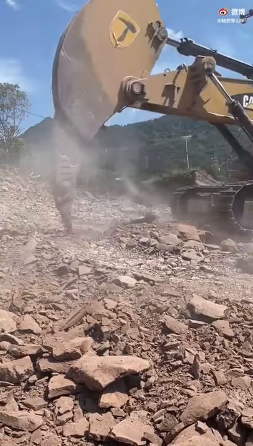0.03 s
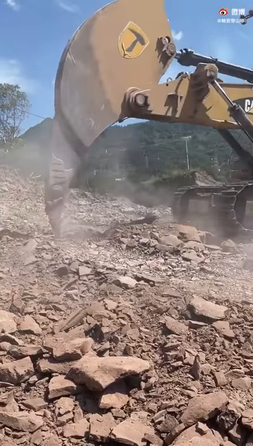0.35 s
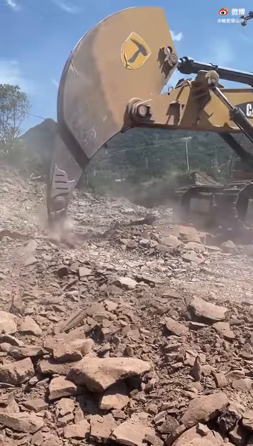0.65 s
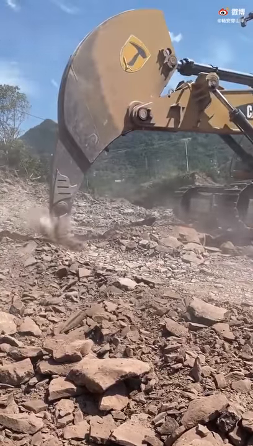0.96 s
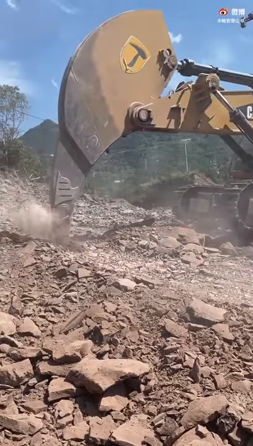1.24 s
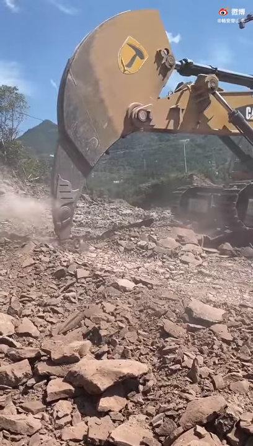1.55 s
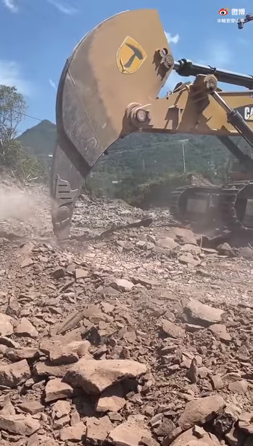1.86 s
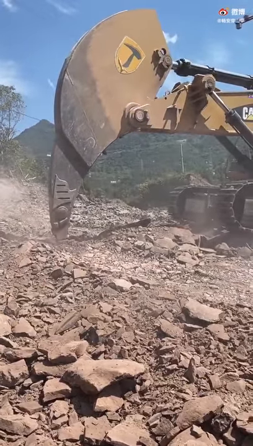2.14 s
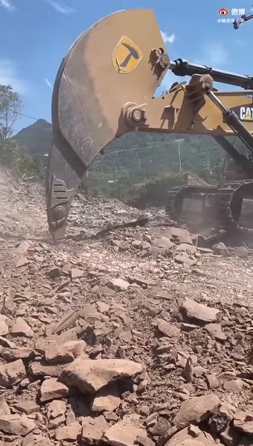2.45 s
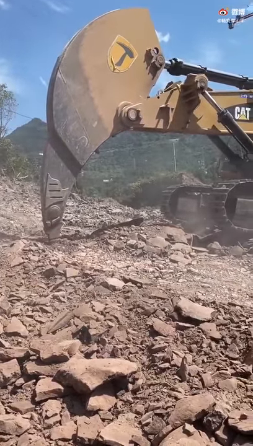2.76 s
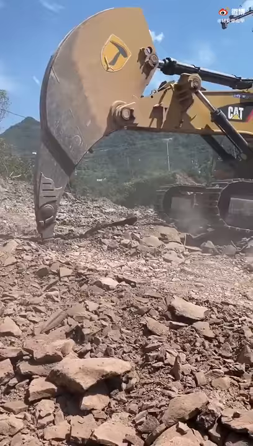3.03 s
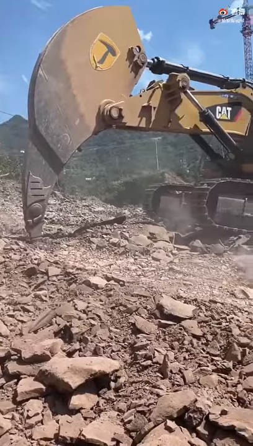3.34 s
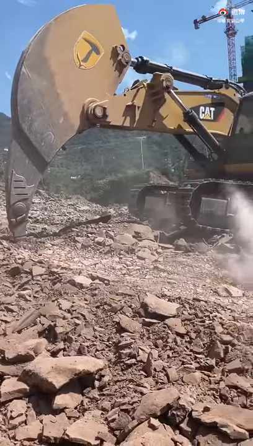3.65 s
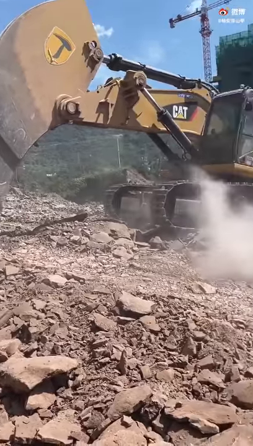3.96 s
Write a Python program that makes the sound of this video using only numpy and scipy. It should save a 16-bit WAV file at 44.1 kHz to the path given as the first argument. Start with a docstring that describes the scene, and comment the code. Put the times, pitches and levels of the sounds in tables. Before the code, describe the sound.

An excavator's steel ripper tooth cracks and grinds through rock over a droning diesel engine.

```python
"""On an open work site, a heavy excavator drags its ripper tooth through rock.
The diesel engine, its fan and the hydraulic pump drone under load, and oil hisses through a valve.
Rubble grinds and tumbles along the tooth, and the steel squeaks on the stone and rings when struck.
Blocks knock together, stones snap, and slabs break and crumble, with short echoes off the ground."""
import sys
import numpy as np
from scipy import signal
from scipy.fft import rfft, irfft
from scipy.io import wavfile
from scipy.ndimage import uniform_filter1d

SR = 44100
rng = np.random.default_rng(int(sys.argv[2]) if len(sys.argv) > 2 else 0)


def to_wav(sig):
    """Store sig (one row per channel, or 1-D mono) as 16-bit WAV at the path in sys.argv[1].

    Samples outside -1..1 are clipped; the rate is SR.
    """
    pcm = np.clip(np.atleast_2d(sig), -1, 1) * 32767
    pcm = np.round(pcm).astype(np.int16)
    wavfile.write(sys.argv[1], SR, pcm.T)  # frames by channels


N = 176400
T = np.arange(N) / SR

# Tone colours of deep thuds, cracking rock and fine grit: pitch_hz, level_db
THUD_COLOUR = [(25, -55), (50, -4), (100, 1.5), (195, 3.5), (260, 1.5), (340, -3), (500, -7), (700, -5),
               (1500, -69)]
CRACK_COLOUR = [(40, -30), (200, 5.5), (450, 4), (620, 1.5), (960, 0.5), (1250, -4.5), (1750, -5.5),
                (2500, -9.5), (4000, -22), (8000, -63)]
GRIT_COLOUR = [(100, -76.5), (1200, 5.5), (2500, 8), (4000, 2), (5200, -3.5), (6400, -6), (8000, -13.5),
               (9500, -41), (16000, -52)]


def undb(db):
    """Turn decibels into a number to multiply a sound by."""
    return 10 ** (np.asarray(db) / 20)


def unit(x):
    """Scale a signal so that its average strength (rms) is 1."""
    return x / np.sqrt(np.mean(x ** 2))


def curve(table, column=1):
    """Join the points in one column of a table with straight lines over time."""
    rows = np.array(table)
    return np.interp(T, rows[:, 0], rows[:, column])


def wander(rate_hz):
    """A smooth random wobble of strength 1, moving at up to about rate_hz."""
    hz = np.arange(N // 2 + 1) * SR / N
    spectrum = rfft(rng.standard_normal(N)) * (hz > 0)
    return unit(irfft(spectrum / (1 + (hz / rate_hz) ** 4), N))


def colour(x, points):
    """Filter a sound through (pitch_hz, level_db) points, then scale it to strength 1."""
    hz, db = np.array(points).T
    bin_hz = np.maximum(np.arange(N // 2 + 1) * SR / N, 1)
    gain = undb(np.interp(np.log(bin_hz), np.log(hz), db))
    cepstrum = irfft(np.log(gain), N)
    # Folding it this way makes the filter ring after each click, never before.
    cepstrum[1:N // 2] *= 2
    cepstrum[N // 2 + 1:] = 0
    return unit(irfft(rfft(x) * np.exp(rfft(cepstrum)), N))


def burst(start, hold, rise, fall):
    """A loudness shape that rises quickly, holds, then dies away; all times in seconds."""
    age = T - start
    return np.clip(age / rise + .5, 0, 1) * np.exp(-np.maximum(age - hold, 0) / fall)


def steady(x, span_s):
    """Even out the slow swells of a random sound."""
    return x / np.sqrt(uniform_filter1d(x * x, int(span_s * SR) + 1) + 1e-4)


def engine():
    """Engine, pump and fan hum together, and the casing's noise throbs with each firing."""
    # How often the engine fires: time_s, rate_hz
    firing = [(.4, 83.1), (.8, 84.46), (2.2, 85.3), (4, 84.13)]
    # Engine and pump tones: multiple_of_firing_rate, level_db
    tones = [(1, -24), (2, -26.5), (3, -34.5), (5, -37.5), (6, -36), (11, -41)]
    # Boost or cut of the exhaust's lowest tone: time_s, change_db
    exhaust = [(0, 0.5), (.65, -21), (.85, 10.5), (1.35, -6.5), (1.55, -5), (1.9, -4), (2.7, 0),
               (3.2, -7.5), (3.7, 4.5), (4, -2.5)]
    # Loudness of the fan's hum: time_s, level_db
    fan_level = [(0, -30.5), (.45, -21.5), (.9, -27), (1.3, -17), (1.55, -31.5), (1.85, -21.5), (3, -26),
                 (4, -31)]
    # Tone colour of the casing and exhaust noise: pitch_hz, level_db
    casing_colour = [(20, -37.5), (35, -28.5), (60, -1.5), (130, -2.5), (220, -8.5), (350, -13),
                     (500, -10.5), (700, -25), (900, -19), (2500, -33), (4500, -52.5), (8000, -104.5)]
    phase = 2 * np.pi * np.cumsum(curve(firing) * (1 + .004 * wander(8))) / SR

    def tone(multiple, rough):
        """A slightly wavering tone that follows the engine's speed."""
        wave = np.sin(multiple * phase + rough * wander(25) + 2 * np.pi * rng.random())
        return wave * undb(2.2 * wander(6))

    hum = sum(tone(k, rough=.32) * undb(db + (curve(exhaust) if k == 1 else 0)) for k, db in tones)
    fan = tone(1.285, rough=.6) * undb(curve(fan_level))
    drone = tone(.71, rough=.45) * undb(-31.5)
    gear_whine = tone(11, rough=.13) * undb(-61)
    casing = colour(rng.standard_normal(N) * (1 + .5 * np.cos(phase)), casing_colour)
    return np.sqrt(2) * (hum + fan + drone + gear_whine) + casing * undb(-24.5 + 1.07 * wander(16))


def valve():
    """Oil hisses through the control valve, sinking in pitch, and whistles until the tooth lands."""
    # The hiss while the arm comes down: time_s, level_db, pitch_hz
    oil_hiss = [(0, -63, 14000), (.45, -55.5, 13800), (.65, -59, 13950), (1.15, -62, 13040),
                (1.4, -70, 12800)]
    phase = 2 * np.pi * np.cumsum(curve(oil_hiss, column=2)) / SR
    hiss = wander(800) * np.sqrt(2) * np.sin(phase)  # the fast wobble smears a tone into noise
    whistle = np.sin(2 * np.pi * 10853 * T) * burst(0, hold=.46, rise=.004, fall=.026)
    return hiss * undb(curve(oil_hiss)) + undb(-66) * whistle


def squeaking():
    """Steel sticks and slips on the stone: raspy, stuttering squeaks over a thin singing, and the tooth rings
    high after two blows."""
    # Squeaks of the steel; the 5360 Hz rows at 1.445 s and 1.676 s are the tooth ringing high after blows:
    # start_s, length_s, level_db, pitch_hz
    squeaks = [(1.445, .06, -40, 5360), (1.607, 0.03, -33, 4058), (1.676, .04, -43, 5360),
               (1.88, 0.1, -29, 4058), (2.222, .08, -37, 4058), (2.48, 0.115, -33.5, 4058),
               (2.678, .05, -36, 4058), (2.81, 0.11, -43, 4058), (3.357, 0.1, -38, 4058),
               (3.55, 0.1, -41, 4058), (3.91, .035, -38, 4058)]
    # Tones that the sliding tooth sings: pitch_hz, width_hz, level_db
    steel_tones = [(4055, 70, 0), (5848, 55, -1), (11542, 12, -13)]
    # Overall loudness of that singing: time_s, level_db
    singing_level = [(1.2, -78), (1.35, -61), (1.8, -54), (1.95, -46), (2.9, -44.5), (3.15, -51)]
    rasp_hz, stutter_hz = 190, 60

    def rasp(hz, width_hz):
        """A tone roughened by fast wobbles in pitch and strength."""
        phase = 2 * np.pi * np.cumsum(hz + width_hz / 2 * wander(rasp_hz)) / SR
        return np.sin(phase) + .55 * wander(rasp_hz) * np.cos(phase)

    squeal = sum(undb(db) * burst(start, length, rise=.0037, fall=.017) * rasp(hz, width_hz=50)
                 for start, length, db, hz in squeaks)
    stutter = (1 + np.tanh(2 * wander(stutter_hz) + 1)) / 2
    singing = sum(undb(db + 4.3 * np.tanh(wander(stutter_hz))) * rasp(hz, width_hz)
                  for hz, width_hz, db in steel_tones)
    return squeal * stutter + singing * undb(curve(singing_level))


def contacts(per_second, spread_db):
    """Random clicks of stone touching stone, some harder than others."""
    chance, size, sign = rng.random(N), rng.standard_normal(N), rng.choice([-1, 1], N)
    return (chance < per_second / SR) * sign * undb(spread_db * np.minimum(size, 2))


def grit(clicks):
    """Turn clicks into fine grit with a faint, very high hiss."""
    # Tone colour of the very high hiss: pitch_hz, level_db
    high_hiss_colour = [(9000, -45), (10700, -20), (11500, -5), (12700, 0), (14200, -3), (15500, -22)]
    return colour(clicks, GRIT_COLOUR) + undb(-25.5) * colour(clicks, high_hiss_colour)


def loose_stones(count):
    """Loose stones clack together, each ringing briefly at its own pitch."""
    low_hz, high_hz, fade_cycles, db_per_octave = 333.6, 2890, 7.9, -6
    out, age = np.zeros(N + 4096), T[:4096]
    for k, (delay, height, force, flip) in enumerate(rng.random((count, 4))):
        hz = low_hz * (high_hz / low_hz) ** height
        db = db_per_octave * np.log2(hz / low_hz) + 12 * force ** 2
        ring = np.exp(-age * hz / fade_cycles) * np.sin(2 * np.pi * hz * age)
        first = int((k + delay) / count * N)
        out[first:first + len(age)] += undb(db) * ring * np.sign(flip - .5)
    return unit(out[:N])


def dragging():
    """The tooth moves in jerks: stones grind and clack, blocks tumble and grit slides."""
    # Loudness of the rubble along the tooth: time_s, grinding_db, tumbling_db
    rubble_level = [(.47, -38, -33.5), (.56, -24.5, -21), (.75, -30, -23), (1.2, -32.5, -34),
                    (1.3, -22, -19.5), (1.5, -41, -39), (1.79, -37, -30), (1.92, -22, -23),
                    (1.98, -33, -32), (2.06, -36, -36), (2.11, -24, -20), (2.25, -21, -19),
                    (2.55, -28.5, -22), (2.9, -23.5, -20), (3.08, -28.5, -23.5), (3.6, -31, -26.5),
                    (4, -32.5, -20)]
    # Loudness of the sliding grit: time_s, level_db
    grit_level = [(0, -44), (1.2, -42), (1.55, -39.5), (1.78, -39), (2.3, -38.5), (4, -38)]
    jerk = wander(6.8)
    clicks = contacts(1300, spread_db=7)
    grind = undb(-1) * colour(clicks, CRACK_COLOUR) + undb(-4) * loose_stones(count=520)
    grind *= undb(curve(rubble_level) + 3.13 * jerk)
    tumble = colour(clicks + contacts(220, spread_db=7), THUD_COLOUR)
    tumble *= undb(curve(rubble_level, column=2) + 3.25 * wander(27))
    slide = grit(clicks + contacts(6000, spread_db=2)) * undb(curve(grit_level) + 2.5 * jerk)
    return grind + tumble + slide


def knocking():
    """Heavy blocks drop against each other and ring briefly with two low tones."""
    # Knocks of the blocks: start_s, level_db, pitch_hz, fade_s
    knocks = [(0.509, -6, 281, 0.048), (1.425, 2.5, 189.6, 0.012), (1.608, -3, 186.3, 0.03),
              (1.848, -0.5, 226, 0.021), (1.885, -5.5, 266, 0.043), (2.071, 2, 236.7, 0.011),
              (2.123, -14, 131, 0.014), (2.18, 1, 195, 0.019), (2.593, -9.5, 271, 0.014),
              (2.755, -1, 271.5, 0.034), (3.487, -2.5, 186.5, 0.029), (3.709, -10.5, 201, 0.033)]
    out = 0
    for start, db, hz, fall in knocks:
        phase = 2 * np.pi * hz * np.maximum(T - start, 0)
        lower = np.sin(phase + .5 * wander(35))
        upper = undb(-10.5) * np.sin(2.1 * phase + wander(160))
        out += undb(db - 7) * burst(start, hold=.002, rise=.002, fall=fall) * (lower + upper)
    return out


def clanking():
    """Hard blows make the steel ripper ring, each with a slightly different mix of its tones."""
    # Blows on the tooth: start_s, level_db
    blows = [(.507, -32), (1.423, -16), (1.595, -28), (2.285, -27), (2.838, -27)]
    # The ripper's natural tones: pitch_hz, level_db, ring_s (time to fade by 60 dB)
    ripper_tones = [(632, -12, .3), (768, -3, .22), (942, -8, .25), (1491, -10, .2), (1830, -3.5, .25),
                    (2433, -10, .25), (3402, -18, .3), (4075, -21, .4)]
    out, rise_s = np.zeros(N), .001
    for start, db in blows:
        first = int(start * SR)
        age = T[:N - first]
        attack = np.minimum(age / rise_s, 1)
        for hz, tone_db, ring_s in ripper_tones:
            gain = undb(db + tone_db + rng.standard_normal())
            fade = np.exp(-np.log(1000) * age / ring_s)
            out[first:] += gain * attack * fade * np.sin(2 * np.pi * (hz * age + rng.random()))
    return out


def snapping():
    """Single stones snap under the tooth with short dry cracks, and bright splinters spray."""
    # Stones snapping: start_s, level_db, treble_share_db, fade_s
    snaps = [(0.745, -10, -8, 0.0025), (0.801, -11, -12, .005), (0.852, -6, -18, 0.0036),
             (0.903, -12, -24, .014), (0.968, -4.5, -27, 0.005), (1.127, -10, -26, 0.0032),
             (1.313, -13, -14, 0.005), (1.422, -8, -12.5, 0.004), (1.562, -12, -22, 0.0047),
             (1.896, -9, -16, .004), (2.229, -8, -18, .004), (2.285, -4, -9, 0.004), (2.374, -7, -14, .003),
             (2.497, -9, -12, 0.004), (2.594, -1.5, -12.5, 0.0031), (2.838, -6, -4, 0.0035),
             (3.208, -13, -22, .008), (3.958, -10, -18, .004)]
    # Sprays of splinters: start_s, level_db
    sprays = [(0.605, -33.5), (2.089, -24), (2.264, -26.5), (2.6344, -29.5), (3.147, -31.5), (3.649, -34.5)]
    # Tone colour of a snap: pitch_hz, level_db
    snap_colour = [(100, -20), (600, -5), (1000, -3), (1800, 2), (2300, -5), (3200, -16), (10000, -58)]
    # Two treble bands for the bright spray, with a filtered gap near 9.5 kHz: pitch_hz, level_db
    treble_bands = [(2500, -15), (5000, 3), (6500, 7), (7800, -10.5), (9500, -49), (12500, -2),
                    (15000, -21.5)]
    out, noise = 0, rng.standard_normal(N)
    body = steady(colour(noise, snap_colour), span_s=.0091)
    treble = colour(noise, GRIT_COLOUR)
    for start, db, treble_db, fall in snaps:
        loudness = undb(db - 8) * burst(start, hold=.002, rise=.0008, fall=fall)
        out += loudness * (body + undb(treble_db) * treble)
    spray = sum(undb(db - 6) * burst(start, hold=.0058, rise=.0036, fall=.0048) for start, db in sprays)
    return out + spray * colour(contacts(1000, spread_db=3.5), treble_bands)


def breaking():
    """Each slab gives way in a rush of cracks, with a low thud and a bright spray of chips."""
    # Slabs breaking: start_s, crack_db, thud_db, chips_db, length_s (the level holds for half of it)
    slabs = [(0.495, -11.5, -11.5, -35, 0.1), (1.264, -13, -22, -63, 0.036), (1.419, -9, -13.5, -33, 0.036),
             (1.587, -5.5, -18.5, -28, 0.01), (1.826, -11.5, -7.5, -33.5, 0.06),
             (1.884, -15.5, -22, -34, 0.12), (2.064, -8, -12, -28.5, 0.028),
             (2.121, -14, -9.5, -33.5, 0.11), (2.225, -15.5, -24, -30.5, 0.026),
             (2.285, -14, -24, -31.5, 0.013), (2.377, -14.5, -12.5, -31, 0.085),
             (2.502, -17, -15.5, -37, 0.02), (2.588, -25.5, -4.5, -38, 0.012),
             (2.745, -13, -6.5, -33.5, 0.029), (2.828, -11.5, -12, -28, 0.03),
             (2.963, -13.5, -9, -32.5, 0.026), (3.486, -22.5, -11, -39, 0.01),
             (3.71, -23, -10.5, -42, 0.033), (3.834, -18, -12.5, -36, 0.019)]
    clicks = contacts(1100, spread_db=1)
    crack_gain = thud_gain = chips_gain = 0
    for start, crack_db, thud_db, chips_db, length in slabs:
        crack_gain += undb(crack_db - 4) * burst(start, hold=length / 2, rise=.004, fall=.026)
        thud_gain += undb(thud_db - 3) * burst(start, hold=length / 2, rise=.004, fall=.023)
        chips_gain += undb(chips_db + 3) * burst(start, hold=length / 2, rise=.004, fall=.045)
    crack = steady(colour(clicks, CRACK_COLOUR), span_s=.037)
    thud = steady(colour(clicks, THUD_COLOUR), span_s=.045)
    chips = steady(grit(clicks), span_s=.021)
    return crack_gain * crack + thud_gain * thud + chips_gain * chips


def ground_echoes(sound):
    """The broken ground scatters a sound into many short, fading echoes."""
    delay_s, fade_s = .004, .051
    echoes = rng.standard_normal(N) * np.exp(-T / fade_s) * (T > delay_s)
    return signal.fftconvolve(sound, echoes / np.linalg.norm(echoes))[:N]


def scene():
    """Mix the machine, the squeaks, the rock and its echoes into one channel."""
    rock = breaking() + snapping() + dragging() + knocking() + clanking()
    echoes = undb(-8) * ground_echoes(rock)
    return (engine() + valve() + squeaking() + rock + echoes)[None]


def record(dry):
    """The microphone rounds off the loudest peaks and cuts the highest treble."""
    ceiling, top_hz = .85, 14900
    rounded = dry / (1 + (dry / ceiling) ** 8) ** (1 / 8)
    return signal.sosfilt(signal.ellip(8, .2, 70, top_hz, fs=SR, output="sos"), rounded)


dry = scene()
out = record(dry)
to_wav(out)
```